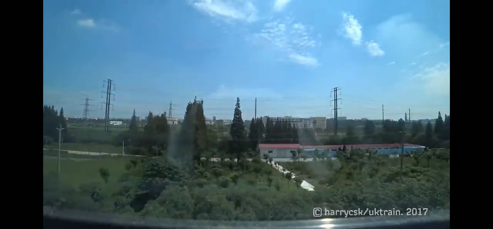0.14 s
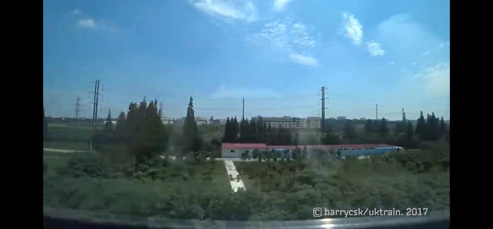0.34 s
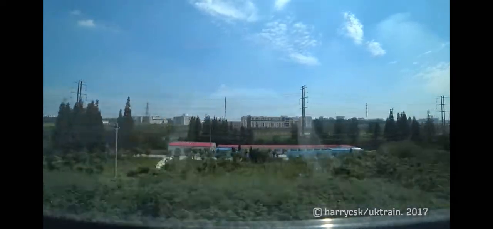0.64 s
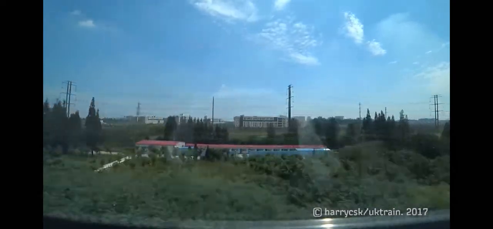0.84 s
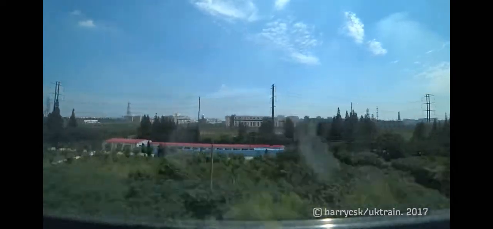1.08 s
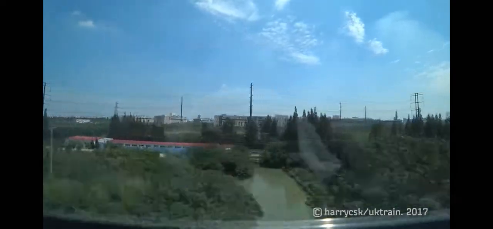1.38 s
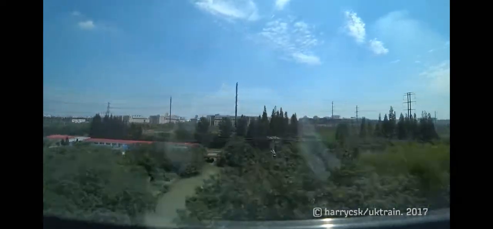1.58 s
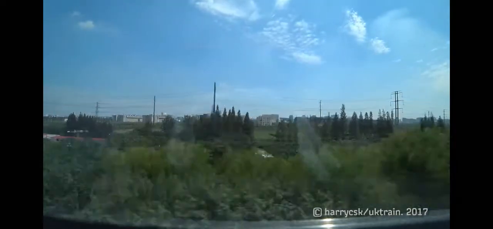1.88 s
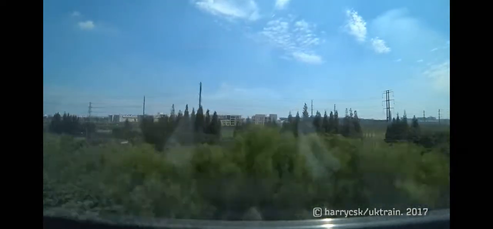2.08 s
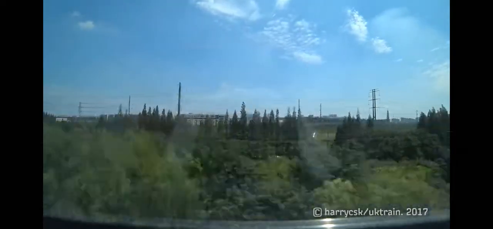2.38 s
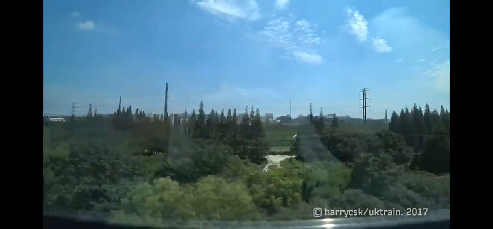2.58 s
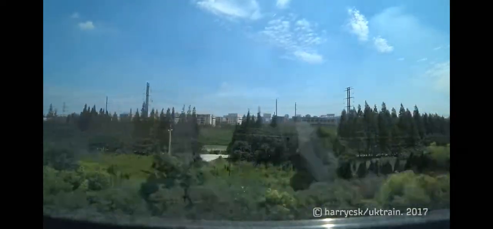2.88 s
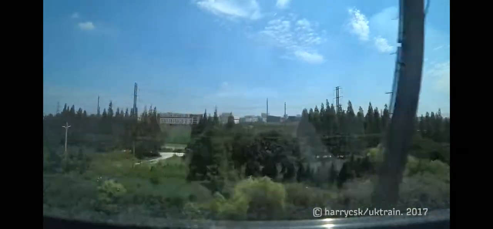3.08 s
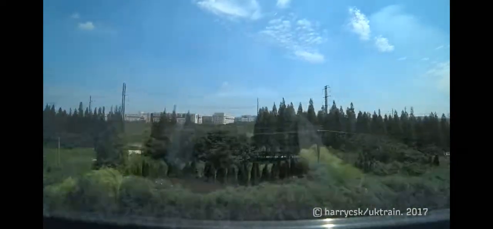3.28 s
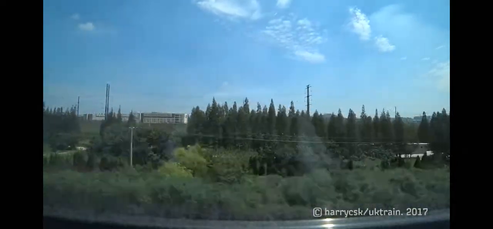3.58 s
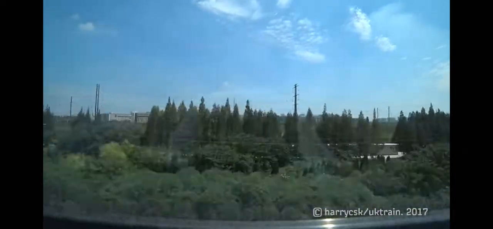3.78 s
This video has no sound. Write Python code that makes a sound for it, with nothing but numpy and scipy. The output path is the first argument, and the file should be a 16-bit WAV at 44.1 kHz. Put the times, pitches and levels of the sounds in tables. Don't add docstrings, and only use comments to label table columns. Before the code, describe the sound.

A fast train's deep floor rumble and duller panel roar run continuously for about 4 seconds, heard from a small stereo camera by the window. A low wheel hum wavers, strongest near 0.4 and 1 second. A faint traction whine rises slightly, shifts sides and strengthens after 3.4 seconds. Low booms swell around 2.2-3.6 seconds; air rush, faint gap whistle, hiss and rapid tiny ticks stay underneath.

```python
import sys
import numpy as np
from scipy import signal
from scipy.fft import rfft, irfft
from scipy.io import wavfile
from scipy.ndimage import uniform_filter1d

SR = 44100
rng = np.random.default_rng(int(sys.argv[2]) if len(sys.argv) > 2 else 0)


def digitize_waveform(pressure):
    field = np.atleast_2d(pressure).T
    bounded = np.clip(field, -1, 1)
    quanta = np.round(bounded * 32767).astype(np.int16)
    wavfile.write(sys.argv[1], SR, quanta)


def linear_from_db(decibels):
    return 10 ** (np.asarray(decibels, float) / 20)


N = 173754


def evened(x):
    return x / np.sqrt(np.mean(abs(x) ** 2) + 1e-20)


def read(points, hz):
    f, value = np.transpose(points)
    return np.interp(np.log(hz + 1), np.log(f + 1), value)


def drift(top_hz, t):
    rates = np.geomspace(top_hz / 20, top_hz, 24)
    return evened(sum(np.sin(2 * np.pi * (f * t + rng.random())) / np.sqrt(f) for f in rates))


# (frequency [Hz], likeness [0-1])
PORT_LIKENESS = [(30, .995), (190, .95), (340, .45), (460, .68), (1600, .22), (2600, .68), (4700, .86),
                 (7300, .1)]
# (frequency [Hz], left lead [rad])
PORT_LEAD = [(30, .28), (130, .55), (290, .8), (370, 2.1), (520, .6), (1300, .6), (2600, .25), (6000, -.1)]
# (frequency [Hz], left minus right [dB])
PORT_TILT = [(30, 3.4), (200, 2.6), (370, -.5), (540, 2.1), (1700, 2.4), (2800, .2), (6000, .5),
             (10000, 2.2)]


def ports(shape, size, swell_db, patch_db, flicker_db):
    hop = size // 4
    hz = np.fft.rfftfreq(size, 1 / SR)
    frames = N // hop + 5
    a, b, c, d, patch = rng.standard_normal((frames, len(hz), 5)).T
    patch = uniform_filter1d(patch, size // 100, 0)
    patch = evened(uniform_filter1d(patch, 3000 // hop, 1))
    same = np.clip(read(PORT_LIKENESS, hz), 0, 1)[:, None]
    left = a + 1j * b
    right = same * left + np.sqrt(1 - same ** 2) * (c + 1j * d)
    right = right * np.exp(-1j * read(PORT_LEAD, hz))[:, None]
    tilt = linear_from_db(read(PORT_TILT, hz) / 2)[:, None]
    swell = swell_db * drift(2.39, np.arange(frames) * hop / SR)
    field_db = swell + patch_db * patch + flicker_db * rng.standard_normal(frames)
    t = (np.arange(frames) - 2) * hop / SR
    z = np.array([left * tilt, right / tilt]) * shape(hz, t) * linear_from_db(field_db)
    out = signal.istft(z, nperseg=size, noverlap=size - hop)[1][:, :N]
    return out / np.sqrt(np.mean(out.mean(0) ** 2))


def colour(table):
    def shape(hz, t):
        beyond = hz > 1.2 * table[-1][0]
        return linear_from_db(read(table, hz) - 40 * beyond)[:, None]
    return shape


# (frequency [Hz], density [dB per Hz])
RUMBLE_COLOUR = [(8.8, -40), (15, -10.5), (54, -1.5), (107, 0), (144, -4), (167, -1.5), (201, -6),
                 (392, -14.5), (420, -22.5), (550, -51), (920, -120)]


def rumble():
    return linear_from_db(-15.5) * ports(colour(RUMBLE_COLOUR), size=4096, swell_db=1.18, patch_db=-0.86, flicker_db=-1.1)


# (frequency [Hz], density [dB per Hz])
ROAR_COLOUR = [(220, -34.5), (380, -7), (466, -5), (620, -3.5), (705, -8.5), (911, -11), (967, -10.5),
               (1370, -16), (2300, -33.5), (2990, -66.5), (5060, -120)]


def roar():
    return linear_from_db(-30) * ports(colour(ROAR_COLOUR), size=2048, swell_db=0.84, patch_db=0.6, flicker_db=0.1)


# (frequency [Hz], density [dB per Hz])
RUSH_COLOUR = [(1240, -31.5), (2100, -8), (2420, -3.5), (3350, -1.4), (3920, -9), (5000, -14.5),
               (6400, -18.5), (7600, -35.5)]


def rush():
    return linear_from_db(-48) * ports(colour(RUSH_COLOUR), size=512, swell_db=-1.0, patch_db=0.86, flicker_db=0.7)


# (frequency [Hz], density [dB per Hz])
HISS_COLOUR = [(5500, -20), (6800, 1.5), (7400, -1.5), (8400, -4), (9300, -10), (10200, -5.5), (11000, -7)]


def hiss():
    return linear_from_db(-69.5) * ports(colour(HISS_COLOUR), size=512, swell_db=0.4, patch_db=-0.2, flicker_db=2.0)


# (frequency [Hz], width [Hz], start level [dB], end level [dB])
PANEL_MODES = [
    (56.4, 15, -28, -26.5),
    (105, 28, -25, -24.5),
    (495.4, 36, -38, -42.5),
    (526, 26, -41, -40),
    (619, 61, -37, -45),
    (655, 54, -44.5, -48.5),
    (2900, 56, -70, -65.5),
]
# (frequency [Hz], width [Hz], start level [dB], end level [dB])
GAP_MODES = [
    (4800, 260, -66.5, -66.5),
    (5356, 240, -69, -69),
    (5900, 220, -69.5, -69.5),
]


def panels_and_gap():
    shift_s, shift_span_s = 2.19, 1
    wander, swell_db = .3, 1.5
    modes = PANEL_MODES + GAP_MODES

    def shape(hz, t):
        along = (1 + np.tanh((t - shift_s) / shift_span_s)) / 2
        levels = [linear_from_db(db0 + (db1 - db0) * along + swell_db * drift(3, t)) for _, _, db0, db1 in modes]
        power = 0
        for (f, width, _, _), level in zip(modes, levels):
            offset = hz[:, None] - f - wander * width * drift(4, t)
            band = 1 / (1 + (2 * offset / width) ** 2) ** 2
            power = power + band / band.sum(0) * level ** 2
        return np.sqrt(power)

    power = shape(np.arange(0, 8000., 8), np.arange(0, N / SR, .02)) ** 2
    total = np.sqrt(np.mean(power.sum(0)))
    return total * ports(shape, size=4096, swell_db=0.5, patch_db=0.5, flicker_db=0.9)


# (time [s], left level [dB], right level [dB], left lead [rad], upper order level [dB])
WHINE_PATH = [(0, -37, -39, .6, -51), (.3, -36.5, -36.5, .5, -49), (.48, -34.5, -35, .3, -49),
              (.75, -38.5, -36, .3, -57), (1.0, -55, -37, .5, -53), (1.25, -41, -38.5, 2.8, -54.5),
              (1.42, -35, -46, 1.8, -49), (1.9, -35.5, -45, 1, -45), (2.1, -41, -52, .8, -55),
              (2.4, -40, -45, 2.6, -54), (2.7, -53, -40, 1.7, -50), (3.09, -45, -43, 1.3, -52.5),
              (3.16, -34.5, -38, .7, -47), (3.38, -36, -37, .7, -43.5), (3.42, -29.5, -32.5, .5, -46),
              (3.7, -29.5, -32.5, .4, -44), (3.94, -28, -31, .5, -47)]
# (multiple of the whine, start level [dB], end level [dB], left minus right [dB])
FAINT_ORDERS = [
    (.5, -39, -43.5, -2),
    (2.0, -59, -59.5, 6),
]


def whine():
    start_hz, rise_hz_per_s = 876.8, 7.8
    t = np.arange(N) / SR
    turn = 2 * np.pi * (start_hz * t + rise_hz_per_s * t ** 2 / 2)
    s, *columns = np.transpose(WHINE_PATH)
    left_db, right_db, lead, upper_db = (np.interp(t, s, column) for column in columns)
    left = linear_from_db(left_db + .7 * drift(13, t)) * np.sin(turn + lead)
    right = linear_from_db(right_db + .7 * drift(8, t)) * np.sin(turn)
    out = np.array([left, right])
    for port in out:
        port += linear_from_db(upper_db + 1.3 * drift(9.1, t)) * np.sin(3 * turn / 2 + 1.3 * drift(1.3, t))
    for k, db0, db1, pan_db in FAINT_ORDERS:
        level = linear_from_db(db0 + (db1 - db0) * t / t[-1] + 1.7 * drift(3, t))
        left = linear_from_db(pan_db / 2) * np.sin(k * turn + 1.3)
        right = linear_from_db(-pan_db / 2) * np.sin(k * turn)
        out += level * np.array([left, right])
    return np.sqrt(2) * out


# (time [s], level [dB])
HUM_SWELL = [(0, -28.5), (.4, -21), (.7, -28), (1.05, -19.5), (1.25, -32), (1.5, -22.5), (2.05, -22),
             (2.3, -24), (2.9, -24), (3.2, -28), (3.55, -21.5), (3.94, -21.5)]


def hum():
    start_hz, rise_hz_per_s = 169.85, 1.35
    t = np.arange(N) / SR
    turn = 2 * np.pi * (start_hz * t + rise_hz_per_s * t ** 2 / 2) + .5 * drift(4, t)
    level_db = -1.1 + np.interp(t, *np.transpose(HUM_SWELL)) + 0.9 * drift(4.3, t)
    pair = np.array([linear_from_db(1.05) * np.sin(turn + 0.34), linear_from_db(-1.4) * np.sin(turn)])
    return np.sqrt(2) * linear_from_db(level_db) * pair


# (time [s], peak level [dB], left minus right [dB])
HARD_TICKS = [(0.1057, -56, 0.0), (0.1436, -57, 1.0), (0.1855, -54, 1.0), (0.2279, -53, 2.0),
              (0.3018, -56, 1.5), (0.3626, -55, 2.0), (0.3741, -50, 4.5), (0.4928, -50, 5.0),
              (0.6096, -57, 3.0), (0.628, -52, 0.5), (0.6679, -57, 1.5), (0.8306, -55, 1.0),
              (0.875, -51, 2.0), (0.8954, -56, 1.0), (0.9533, -55, 1.5), (0.9732, -55, 0.0),
              (1.1009, -55, 1.5), (1.1349, -54, 1.0), (1.1558, -55, 0.0), (1.3439, -56, 1.0),
              (1.4472, -56, 1.0), (1.4861, -55, 0.5), (1.7305, -55, 1.0), (1.757, -56, 2.5),
              (1.7719, -53, 0.0), (1.8717, -56, 0.5), (1.8862, -55, 1.5), (1.9919, -55, 2.5),
              (2.1231, -55, 2.0), (2.2054, -54, 2.5), (2.2453, -53, 1.0), (2.3132, -55, 1.5),
              (2.3501, -53, 3.0), (2.393, -56, 1.0), (2.4673, -55, 1.0), (2.6345, -53, 3.0),
              (2.7377, -54, 0.5), (2.8121, -55, 3.0), (2.831, -56, 0.5), (2.856, -57, 0.5),
              (2.8744, -55, 2.5), (2.9153, -55, 0.0), (3.0335, -52, 2.5), (3.0585, -48, 6.5),
              (3.3094, -55, 1.5), (3.3793, -57, 1.5), (3.4207, -55, 1.0), (3.4965, -53, 3.5),
              (3.5723, -54, 1.0), (3.6197, -55, 1.5), (3.6536, -55, 1.5), (3.7005, -57, 1.0),
              (3.7115, -51, 0.0), (3.728, -52, 2.0), (3.7983, -58, 2.5), (3.7983, -49, 4.5),
              (3.8527, -57, 0.0), (3.8861, -54, 2.0)]
# (frequency [Hz], level [dB])
TICK_COLOUR = [(1500, -10), (4000, 2), (7000, 0.1), (9300, -2.5), (10500, 0.1)]


def ticks():
    ticks_per_s, jitter, tick_db, spread_db = 50, .2, -39, 2.4
    left_lag_s, clear_s = .0002, .011
    hard_db, hard_late_s, hard_lean_db = 20.5, .0012, 1
    gap, size, sign = rng.standard_normal((400, 3)).T
    at = np.cumsum(np.clip(1 + jitter * gap, .3, 3)) / ticks_per_s
    s, db, pan_db = np.transpose(HARD_TICKS)
    free = (at < N / SR - clear_s) & (abs(at[:, None] - s).min(1) > clear_s)
    height = linear_from_db(tick_db + spread_db * np.minimum(size, 1)) * np.sign(sign)
    train = np.zeros((2, N))
    train[:, (at[free] * SR).astype(int)] = height[free]
    lean_db = np.outer([.5, -.5], pan_db - hard_lean_db)
    train[:, ((s + hard_late_s) * SR).astype(int)] = linear_from_db(db + hard_db + lean_db)
    hz = np.fft.rfftfreq(N, 1 / SR)
    z = rfft(train) * linear_from_db(read(TICK_COLOUR, hz))
    left = irfft(z[0] * np.exp(-2j * np.pi * hz * left_lag_s), N)
    right = irfft(z[1], N)
    return np.array([linear_from_db(2.0) * left, linear_from_db(-1.5) * right])


# (frequency [Hz], width [Hz], centre time [s], half length [s], level [dB])
PANEL_SURGES = [(604, 27, 0.34, 0.091, -33.5), (645, 13, .5, .08, -34), (586, 23, 0.32, 0.11, -32.5),
                (510, 15, 0.62, 0.076, -33), (606, 20, 1.7, 0.13, -34.5), (628, 16, 1.3, .14, -34.5),
                (549, 18, 1.5, .14, -34), (524, 28, 2.7, 0.15, -36), (548, 16, 3.87, .1, -34),
                (119, 14, 2.3, 0.088, -23), (119, 20, 3.2, .1, -21), (58.5, 7.8, 2.2, 0.095, -25),
                (55, 11, 2.8, 0.16, -21), (50, 12, 3.65, 0.084, -24.5), (110, 11, .9, 0.072, -23.5),
                (100, 18, 3.5, .12, -21)]


def surges():
    coarse, t = np.arange(0, N, 16) / SR, np.arange(N) / SR
    out = np.zeros((2, N))
    for f_hz, width, s, half, db in PANEL_SURGES:
        wobble = np.interp(t, coarse, 0.089 * width * drift(9, coarse))
        flutter_db = np.interp(t, coarse, 2.8 * drift(14, coarse))
        swell = linear_from_db(db - 1 + flutter_db) * np.exp(-((t - s) / half) ** 2 / 2)
        turn = 2 * np.pi * f_hz * t + wobble
        tilt = linear_from_db(read(PORT_TILT, f_hz) / 2)
        pair = np.array([tilt * np.sin(turn + read(PORT_LEAD, f_hz)), np.sin(turn) / tilt])
        out += np.sqrt(2) * swell * pair
    return out


def scene():
    noise = rumble() + roar() + rush() + hiss()
    return noise + panels_and_gap() + surges() + whine() + hum() + ticks()


def band_limit(x):
    return signal.sosfilt(signal.butter(12, 11030, fs=SR, output="sos"), x)


def record(dry):
    even_s, even_share, rest_db = .035, .22, -13.7
    knee, edge_hz, stop_s = 1.05, 11100, .006
    span = round(even_s * SR)
    power = uniform_filter1d((dry ** 2).mean(0), span)
    power_db = 10 * np.log10(uniform_filter1d(power, span // 2) + 1e-9)
    held = dry * linear_from_db(-even_share * (power_db - rest_db))
    over = abs(held).max(0) / knee + 1e-9
    soft = held * np.tanh(over) / over
    soft = np.pad(soft, ((0, 0), (511, 511)), "reflect", reflect_type="odd")
    lowpass = signal.firwin(1023, edge_hz, window=("kaiser", 9), fs=SR)
    edged = signal.oaconvolve(soft, lowpass[None], "valid", axes=1)
    left_s = np.arange(N)[::-1] / SR
    mix = edged * np.sin(np.pi / 2 * np.minimum(left_s / stop_s, 1)) ** 2
    return band_limit(mix)


dry = scene()
out = record(dry)
digitize_waveform(out)
```